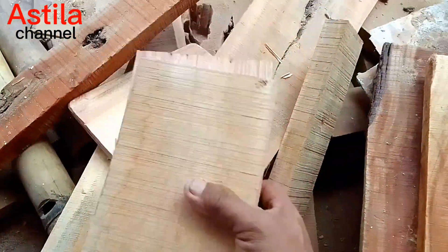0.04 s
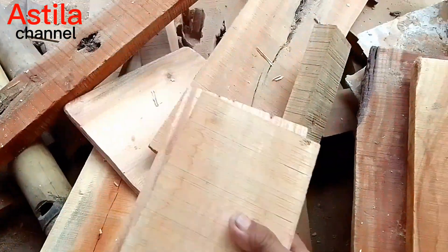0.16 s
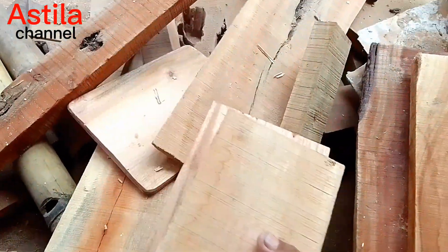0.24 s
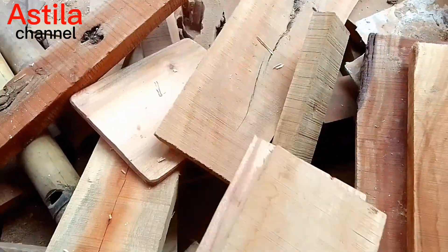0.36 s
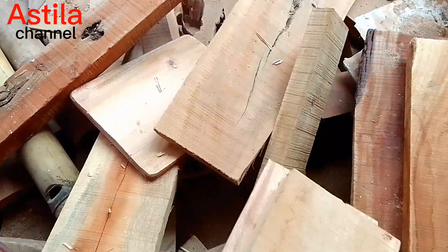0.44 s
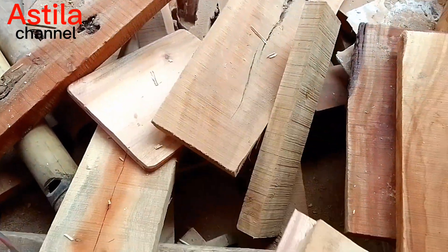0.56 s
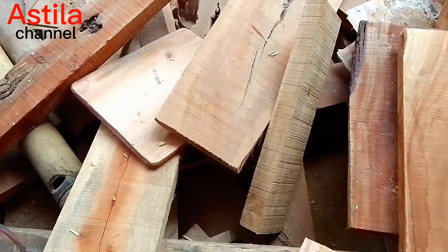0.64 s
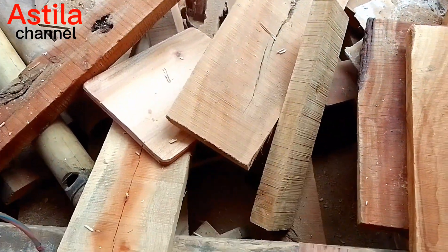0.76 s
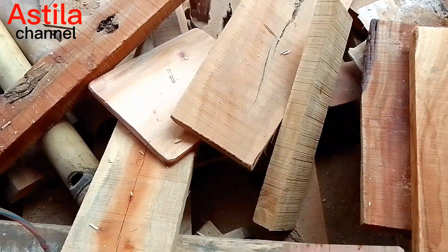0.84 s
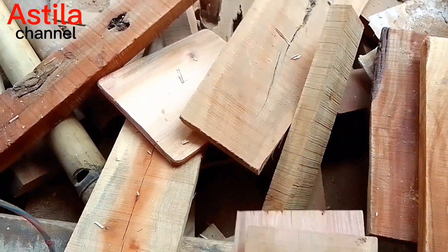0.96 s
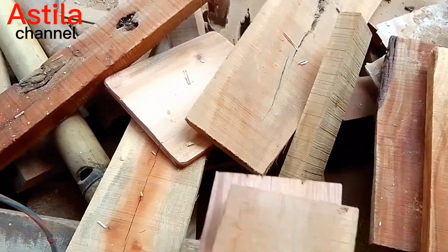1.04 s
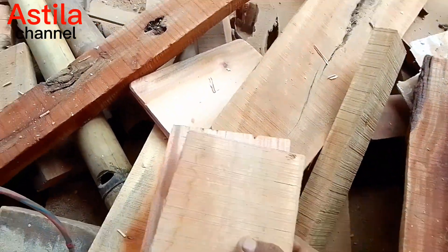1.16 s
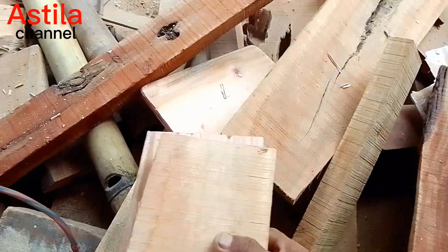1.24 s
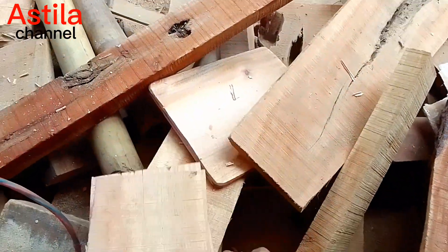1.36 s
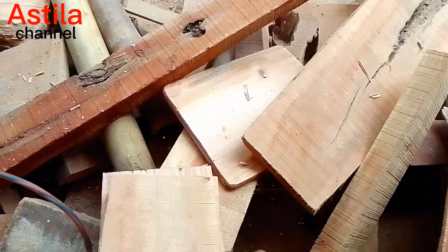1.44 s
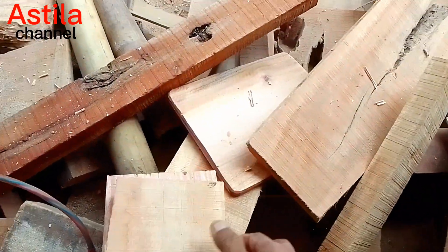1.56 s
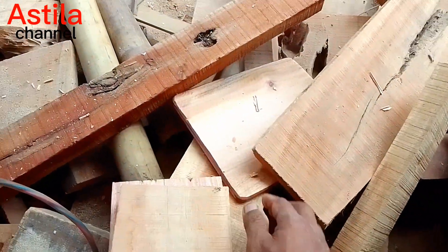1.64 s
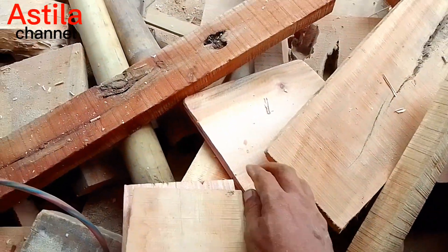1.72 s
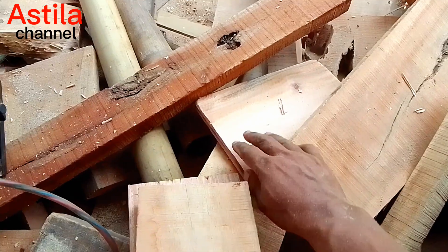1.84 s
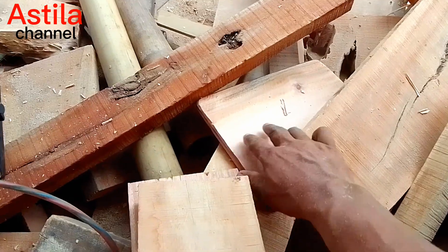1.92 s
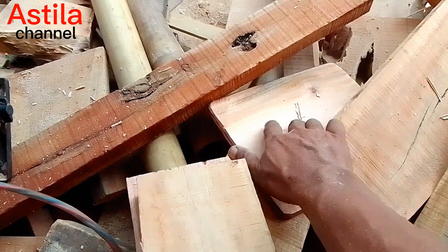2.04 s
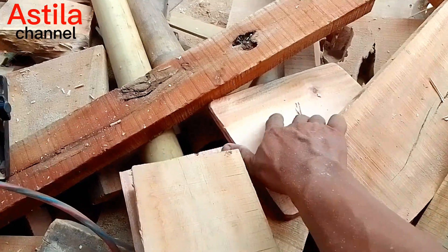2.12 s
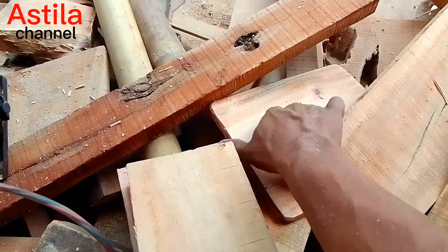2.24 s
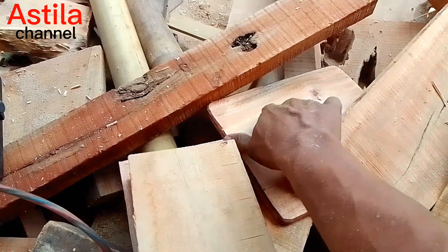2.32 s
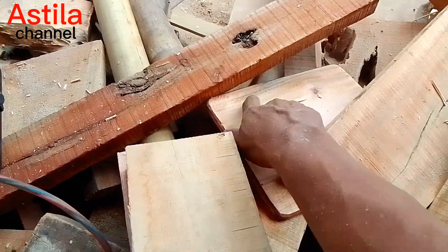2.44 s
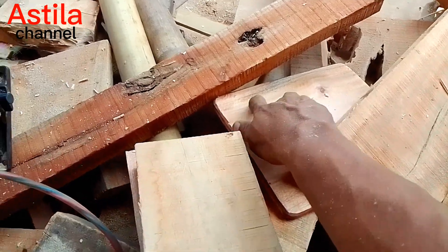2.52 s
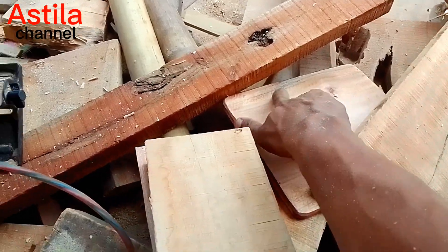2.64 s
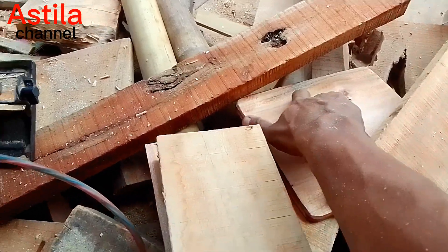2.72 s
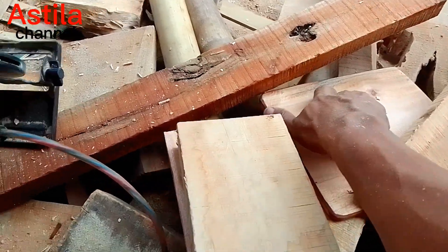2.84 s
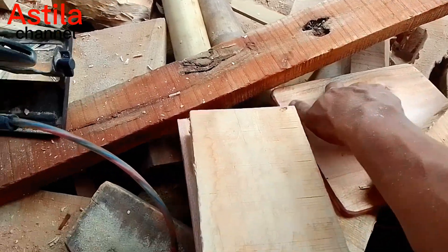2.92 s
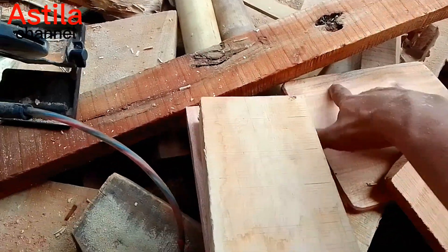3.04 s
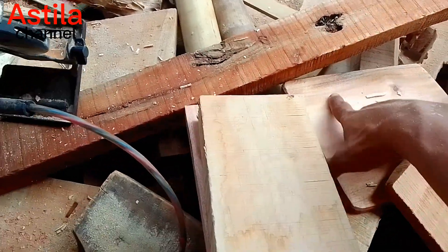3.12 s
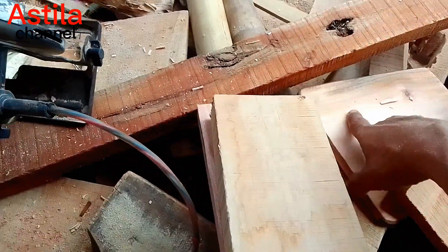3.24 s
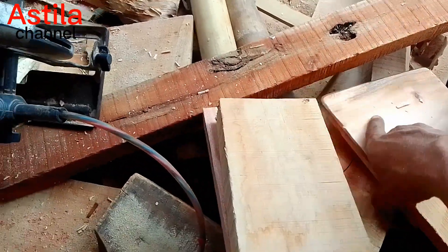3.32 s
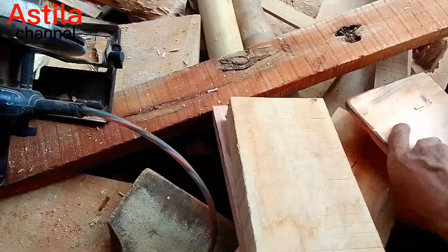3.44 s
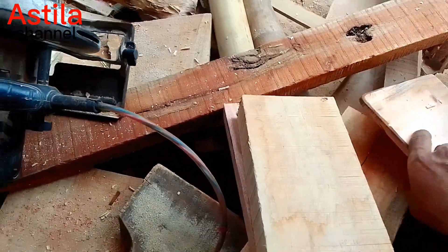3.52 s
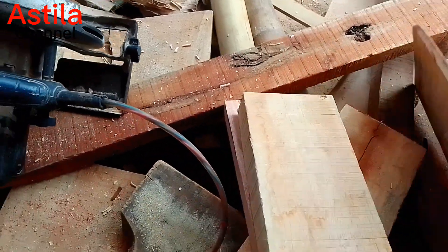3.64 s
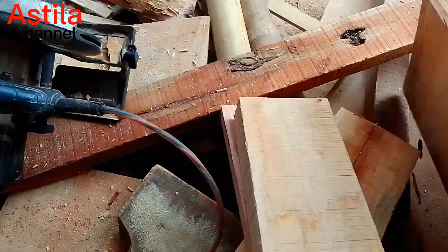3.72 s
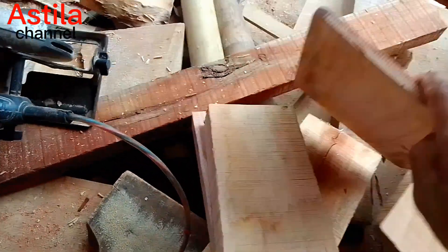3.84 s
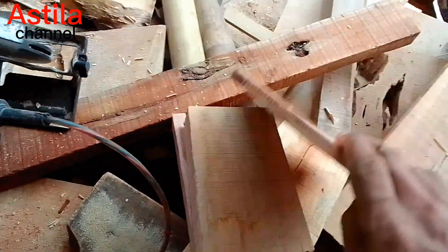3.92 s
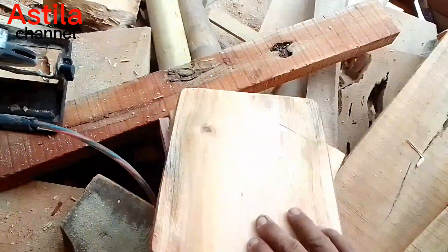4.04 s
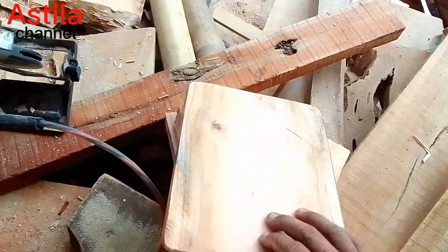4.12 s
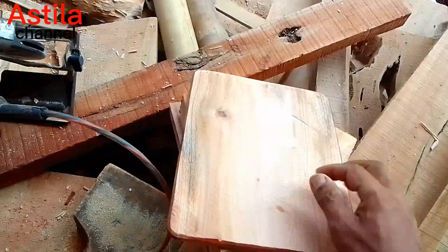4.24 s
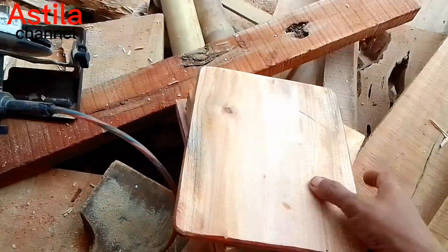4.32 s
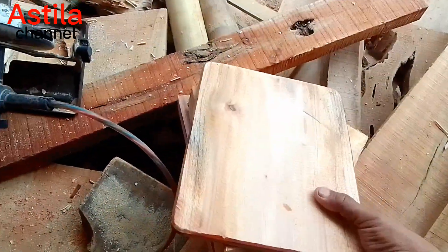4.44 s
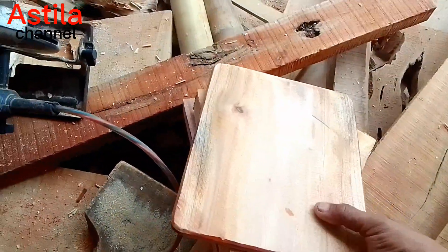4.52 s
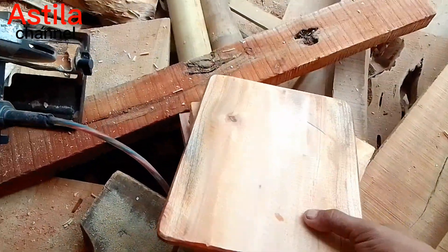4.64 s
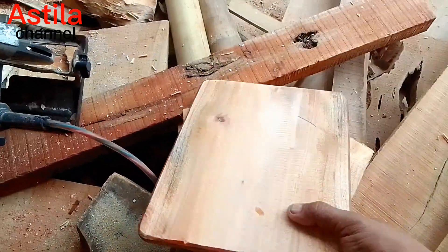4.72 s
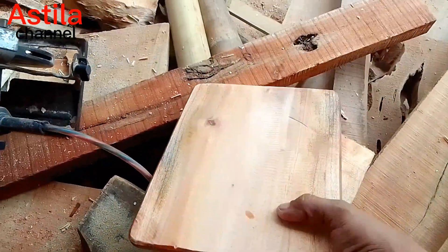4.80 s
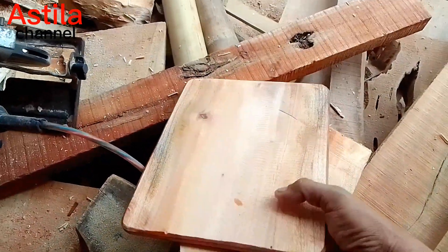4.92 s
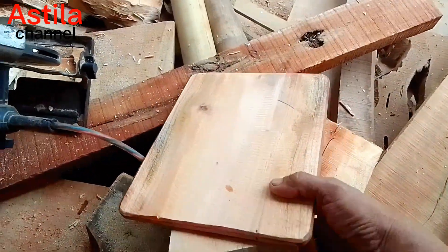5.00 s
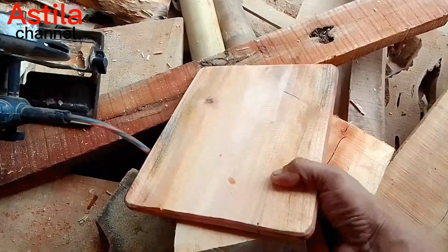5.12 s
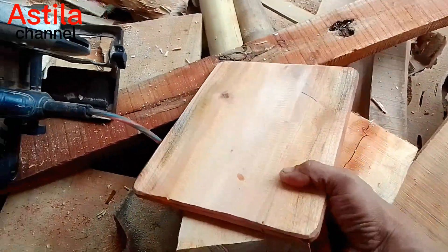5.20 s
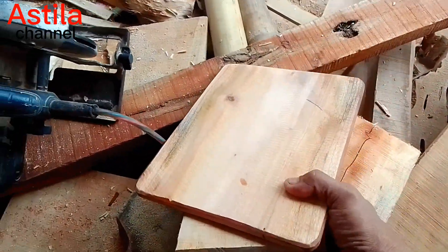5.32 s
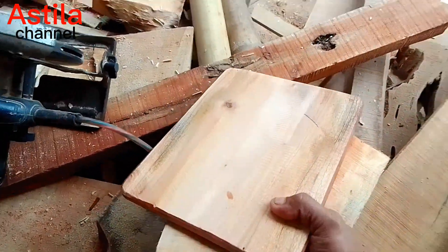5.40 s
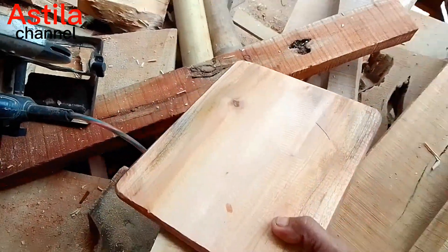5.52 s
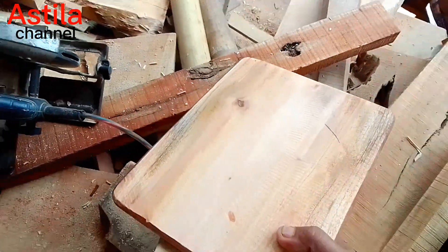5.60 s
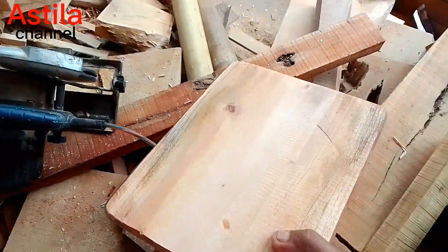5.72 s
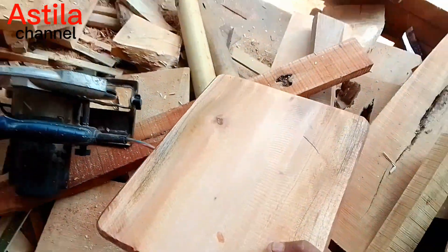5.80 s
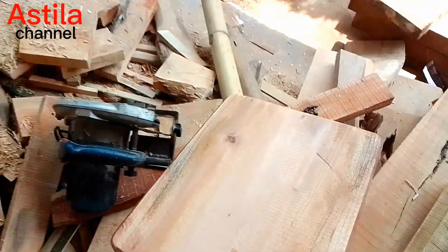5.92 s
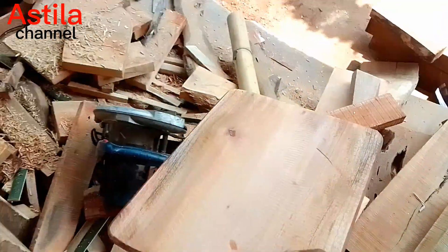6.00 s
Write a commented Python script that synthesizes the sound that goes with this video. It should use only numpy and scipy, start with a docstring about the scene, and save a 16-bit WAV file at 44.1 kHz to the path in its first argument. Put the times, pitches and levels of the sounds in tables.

```python
"""Wooden offcuts are lifted, dragged and stacked on a scrap pile close to a small microphone in an open shed.
Knocks are decaying modes with a thud and a crack; drags are stick-slip noise through resonances of the wood.
Further off a plank is dropped twice, and the shed rings after it through fading random echoes.
Low noise in gusts and single slow swings thump the microphone, over a quiet wash and a distant rumble."""
import sys
import numpy as np
from scipy import signal
from scipy.fft import rfft, irfft
from scipy.io import wavfile
from scipy.ndimage import uniform_filter1d

SR = 44100
rng = np.random.default_rng(int(sys.argv[2]) if len(sys.argv) > 2 else 0)


def waveform_to_disk(signal):
    """Save audio, clipped to [-1, 1], as 16-bit WAV at the path in sys.argv[1]."""
    frames = np.transpose(np.atleast_2d(signal))
    scaled = np.clip(frames, -1, 1) * 32767
    samples = np.round(scaled).astype(np.int16)
    wavfile.write(sys.argv[1], SR, samples)


def gain_from_decibels(decibels):
    """Convert decibel values to linear amplitude factors."""
    exponent = np.asarray(decibels, float) / 20
    return 10 ** exponent


N = 267290  # samples

# Modes of each board. Each row: frequency in Hz, width in Hz before scaling, relative level in dB.
BOARD_MODES = [
    [(1560, 47, -4), (2170, 140, 6), (3020, 94, -11)],
    [(547, 80, 2), (730, 56, 1.5), (1140, 23, -0.5), (1352, 113, 4), (1700, 81, 0), (2190, 150, -1)],
    [(528, 163, -0.5), (1020, 240, 1), (1392.6, 32, 5), (1668, 20, 5), (1954, 17, 3), (2440, 41, -19.5),
     (2624, 21, 1.5), (2940, 35.3, -28), (3226, 67, -27.5)],
    [(605, 65, 4.5), (869.5, 160, 12), (1105, 59, 5.5), (1321, 63, 10.5), (1580, 69, 14), (1950, 43, 8.5),
     (2170, 32, 3.5)],
]
# When each board is taken up, in seconds.
TAKEN_UP = [0, 1.8, 3.335, 4.4]
# How each board behaves. Each row: ring t60 at 1 kHz in seconds, shed echo of a knock in dB,
# boom of the pile under rubbing in dB.
HANDLING = [(.04, -12, -1), (0.053, -11, -4), (0.041, -13.5, -6), (0.044, -9.5, -5)]


def evened(x):
    """Normalisation: scales a signal to rms 1."""
    return x / np.sqrt(np.mean(x ** 2) + 1e-20)


def read(points, hz):
    """Interpolation: reads a curve at hz, straight on a log frequency axis."""
    f, value = np.transpose(points)
    return np.interp(np.log(hz + 1), np.log(f + 1), value)


def add(mix, s, sound):
    """Superposition: mixes a sound in at time s, in place."""
    part = mix[round(s * SR):][:len(sound)]
    part += sound[:len(part)]


def coloured(x, points):
    """Spectral shaping: weights each frequency by a curve in dB, then scales to rms 1."""
    gain = gain_from_decibels(read(points, np.fft.rfftfreq(len(x), 1 / SR)))
    return evened(irfft(rfft(x) * gain, len(x)))


def passed(x, hz, kind):
    """Steep filtering: a fourth-order low- or high-pass."""
    return signal.sosfilt(signal.butter(4, min(hz, 20000), kind, fs=SR, output="sos"), x)


def resonate(x, hz, width):
    """Resonance by heterodyne: shifts hz down to zero, smooths, shifts back; gain 1 at the peak."""
    turn = np.exp(2j * np.pi * np.cumsum(hz * np.ones(len(x))) / SR)
    r = np.exp(-np.pi * width / SR)
    smooth = signal.lfilter([1 - r], [1, -r], x / turn)
    return 2 * (turn * smooth).real


def resonate_twice(x, hz, width):
    """Resonators in cascade: two equal ones give steeper skirts."""
    return resonate(resonate(x, hz, width), hz, width)


def wander(length, hz):
    """Slow random modulation: noise averaged twice over 1 / hz seconds, rms 1."""
    span = int(SR / hz)
    return evened(uniform_filter1d(uniform_filter1d(rng.standard_normal(length), span), span))


def board_in_hand(s):
    """Succession of sources: index of the board held at time s."""
    return np.searchsorted(TAKEN_UP, s) - 1


def drag(wood, edges, boom_db, rows):
    """Stick-slip friction: saw-marked faces catch and slip in dense uneven clicks.

    They ring the board and its edges, boom in the pile and hiss in the dust."""
    # Dust under a sliding face. Each row: frequency in Hz, relative level in dB per Hz.
    grit_spectrum = [(1500, -17), (2500, 3.5), (3400, 3), (4200, -2.5), (6000, -5.5), (8700, -6.5),
                     (9600, -20), (10500, -44), (15500, -37), (16500, -93)]
    s, *columns = np.transpose(rows)
    t = np.arange(s[0] - .004, s[-1] + 0.014, 1 / SR)
    rub_db, contact_hz, hiss_db = (np.interp(t, s, c) for c in columns)

    sizes = gain_from_decibels(3.4 * np.minimum(rng.exponential(1, len(t)), 3.5))
    slips = (rng.random(len(t)) < 2000 / SR) * sizes * rng.choice([-1, 1], len(t))  # about 2000 a second
    uneven_db = 2.5 * wander(len(t), 90) + 1.7 * wander(len(t), 30)
    force = (evened(slips) + .9 * rng.standard_normal(len(t))) * gain_from_decibels(uneven_db)

    body, singing = np.zeros((2, len(t)))
    for hz, width, db in wood:
        near_db = -6.0 * np.log2(hz / contact_hz) ** 2  # modes near the contact pitch speak most
        wide = np.clip(1.96 * width, 50, 300)
        body += gain_from_decibels(db + near_db + 3 * wander(len(t), 25)) * resonate_twice(force, hz, wide)
    for hz, width, db in edges:
        wide = np.clip(2 * width, 90, 300)
        # each comes and goes as the contact moves
        singing += gain_from_decibels(db + 2.8 * wander(len(t), 13)) * resonate_twice(force, hz, wide)

    contact = resonate_twice(force, contact_hz, 105)
    boom = passed(resonate_twice(force, 250, 390), 150, "high")
    dust = coloured(force, grit_spectrum)
    rub = evened(passed(evened(body) + 0.74 * evened(contact), 3500, "low"))
    hiss = evened(1.1 * dust + evened(singing))
    stroke = gain_from_decibels(rub_db) * (rub + gain_from_decibels(boom_db) * evened(boom)) + gain_from_decibels(hiss_db) * hiss
    return stroke * signal.windows.tukey(len(t), 0.025 * SR / len(t))


def dragged_boards():
    """Sliding friction: each stroke of wood on wood drives the board in hand; gives (s, sound)."""
    # One table a stroke. Each row: time in seconds, rubbing level in dB, contact pitch in Hz, hiss level in dB.
    strokes = [
        [(0.186, -91, 1740, -65), (0.252, -93, 1740, -71), (0.332, -84, 1760, -74.5), (0.345, -94, 1700, -95),
         (0.38, -92, 1420, -91)],
        [(2.38, -65, 1170, -90), (2.45, -76.5, 1100, -88), (2.55, -67, 1200, -74), (2.585, -87, 1170, -97),
         (2.7, -65, 1100, -77), (2.74, -58, 955, -72), (2.784, -49.5, 650, -64), (2.83, -59.5, 620, -75),
         (2.96, -68, 624, -71)],
        [(2.99, -44.5, 560, -71.5), (3.035, -62, 620, -67), (3.06, -45.5, 600, -71), (3.1, -51.5, 750, -69),
         (3.172, -51.5, 726, -61), (3.286, -66.5, 723, -85), (3.33, -63, 748, -72)],
        [(3.335, -57.5, 716, -67), (3.401, -47.5, 1070, -56), (3.441, -32, 905, -50), (3.507, -42, 718, -49),
         (3.585, -35.5, 723, -53.5), (3.62, -53, 760, -59.5), (3.655, -39.5, 1280, -42.5),
         (3.695, -34, 1368, -44.5), (3.73, -46.5, 1250, -56.5)],
        [(3.735, -40, 1500, -50), (3.755, -26.5, 1480, -43), (3.78, -31, 1300, -45.5), (3.8, -25, 970, -34),
         (3.86, -27, 975, -45.5), (3.92, -37, 1040, -42), (3.968, -40.5, 1080, -42), (4.005, -28, 874, -62),
         (4.04, -57, 850, -66.5)],
        [(4.085, -29.5, 1070, -58.5), (4.112, -38, 1050, -57), (4.14, -27, 1160, -59),
         (4.165, -45, 1230, -63.5), (4.18, -29.5, 1700, -50.5)],
        [(4.7, -92, 1300, -85), (4.744, -67, 1360, -78.5), (4.785, -87, 1370, -81)],
        [(4.875, -46, 1220, -62.5), (4.933, -54.5, 1140, -63.5), (4.97, -52, 1400, -71),
         (5.02, -44.5, 1930, -72), (5.09, -43.5, 1890, -75), (5.13, -46.5, 1560, -73), (5.2, -58.5, 1500, -75),
         (5.228, -49.5, 1600, -79), (5.25, -53, 1530, -75), (5.39, -64.5, 1590, -83), (5.425, -80, 1510, -84)],
        [(5.475, -52, 731, -92), (5.519, -60, 700, -90), (5.6, -64.5, 600, -90.5), (5.68, -78, 620, -91)],
    ]
    # Thin edges that sing when rubbed, one list a board.
    # Each row: frequency in Hz, width in Hz before scaling, relative level in dB.
    edge_modes = [
        [(4340, 130, -7), (4620, 86, -7), (5270, 200, -7), (6350, 40, -6), (7040, 31, -7), (7370, 32, -8),
         (7900, 52, -13), (8800, 150, -20)],
        [(2860, 105, 7), (3010, 29, -14), (3230, 61, 2), (5820, 67, -3), (6260, 78, -16), (7270, 50, 2),
         (7600, 57, -20), (8300, 190, -17), (8700, 33, -1)],
        [(2452, 32, 4.5), (2703, 46, -12), (3140, 57, -14), (3460, 99, -7), (4480, 72, -12.5),
         (4866, 420, -12.5), (5760, 43, -23), (6900, 43, -13.5), (7540, 66, -17), (8370, 71, -45.5),
         (8850, 19, -35)],
        [(3220, 150, 9), (3950, 55, 1), (4250, 73, 5.5), (5270, 53, 8), (6160, 42, 4), (6470, 80, 8),
         (7140, 40, 6), (7850, 44, -9), (9000, 58, -16), (9390, 51, 0)],
    ]
    sounds = []
    for rows in strokes:
        board = board_in_hand(rows[-1][0] - .04)
        sound = drag(BOARD_MODES[board], edge_modes[board], HANDLING[board][2], rows)
        sounds.append((rows[0][0], sound))
    return sounds


def knock(wood, db, struck_hz, thud_db, crack_db, t60):
    """Modal impact: a blow rings the modes near its pitch most, with a low thud of the pile and a short crack."""
    # First contact of a blow. Each row: frequency in Hz, relative level in dB per Hz.
    crack_spectrum = [(1500, -9), (2500, 7.5), (3500, 1.5), (5000, -12), (7500, -23), (10000, -37),
                      (15500, -36), (16500, -88)]
    t = np.arange(round(.25 * SR)) / SR
    hz, _, mode_db = np.transpose(wood)
    extra = 450 * 6 ** rng.random(14)  # random weak modes make the ring denser
    hz = np.r_[hz, struck_hz, extra]
    mode_db = np.r_[mode_db, 2.5, np.full(len(extra), -10.5)]
    # where it is hit
    place_db = 1.6 * rng.standard_normal(len(hz)) - 7.2 * np.log2(hz / struck_hz) ** 2

    decay = max(t60, .005) * (hz / 1000) ** -.6  # wood damps its high modes first
    swings = np.sin(2 * np.pi * (hz[:, None] * t + rng.random((len(hz), 1))))
    ring = gain_from_decibels(mode_db + place_db) @ (gain_from_decibels(-60 * t / decay[:, None]) * swings)
    load_s = max(.0013 - .00006 * db, .001)  # the contact loads over a moment, longer for gentle blows
    ring *= np.sin(np.pi / 2 * np.minimum(t / load_s, 1)) ** 2

    low, high = rng.standard_normal((2, len(t)))
    thud = evened(passed(resonate_twice(low, 300, 350), 140, "high"))
    thud = thud * gain_from_decibels(-60 * t / 0.062) * (1 - np.exp(-t / 0.0044))
    crack = coloured(high, crack_spectrum) * gain_from_decibels(-60 * t / 0.033) * (1 - np.exp(-t / 0.0015))
    return gain_from_decibels(db) * (ring / abs(ring).max() + gain_from_decibels(thud_db) * thud + gain_from_decibels(crack_db) * crack)


def knocking_boards():
    """Modal impact: boards knock, and a few blows are strong catches of a scrape; gives (s, sound, echo dB)."""
    # Each row: start in seconds, ring peak in dB, struck pitch in Hz, thud and crack in dB relative to the ring.
    # The blows at 3.748, 3.794, 3.823 and 3.916 s are catches of a scrape.
    blows = [(1.901, -52, 1187, -0.5, -24), (2.348, -44, 781, 1, -31), (2.408, -60, 1290, -18, -7),
             (2.976, -36.5, 1283, -13, -20), (2.987, -28.5, 528, -16, -41), (3.025, -36, 1495, -10, -21),
             (3.048, -33.5, 560, -17, -49), (3.303, -48, 430, -29, -20), (3.34, -45.5, 483, -24.5, -22),
             (3.393, -34, 590, -19.5, -11), (3.462, -8.5, 663, -17.5, -19.5),
             (3.481, -20.5, 664.6, -19, -17.5), (3.532, -14.5, 483, -3.5, -13), (3.564, -20, 457, -1, -34),
             (3.667, -31, 547, -13, 0), (3.748, -23.5, 1605, -17, -10), (3.794, -16, 944, -18.5, -15.5),
             (3.823, -17, 1020, -14.5, -16), (3.841, -17.5, 1532, -20, -21.5),
             (3.869, -13.5, 651, -25, -14), (3.881, -2, 977, -13.5, -12), (3.916, -26, 1015, -32.5, -13.5),
             (3.981, -13, 637, -8.5, -27), (4.05, -2.5, 684, -15.5, -35), (4.053, 3, 1024, -10, -28.5),
             (4.066, -10.5, 958, -14, -53.5), (4.122, -7.5, 1228, -8.5, -14.5),
             (4.182, -2, 1026, -31.5, -18), (4.429, -49.5, 493, 8, -46), (4.512, -63.5, 441, 16, -40),
             (4.797, -35, 673, -3, -22), (4.807, -27.5, 870, 3, -17.5), (4.841, -17.5, 968, -18.5, -23),
             (5.101, -26.5, 1580, -9.5, -57), (5.219, -40, 1190, -4, -29), (5.38, -62.5, 1600, -21, 5),
             (5.44, -33, 1710, 1.5, -21.5), (5.455, -36, 693, 1.5, -46)]
    hits = []
    for s, *blow in blows:
        board = board_in_hand(s)
        t60, echo_db, _ = HANDLING[board]
        hits.append((s, knock(BOARD_MODES[board], *blow, t60), echo_db))
    return hits


def dropped_plank():
    """Modal impact: each landing further off is a short clatter of blows; gives (s, sound, echo dB).

    An earlier blow, returned first and apart, is for its dying echo alone."""
    # Each row: start in seconds, ring peak in dB, struck pitch in Hz, crack in dB relative to the ring,
    # shed echo in dB.
    landings = [(0.78, -16, 1318, -50.5, -7.5), (0.788, -10, 1950, -36, -12),
                (0.7934, -5.5, 1297, -37, -10.5), (0.845, -22, 1296, -30.5, -3.5),
                (0.864, -23.5, 1280, -29, -3.5), (1.487, -12.5, 1140, -16, -5.5),
                (1.494, -5, 1218, -29.5, -6.5), (1.513, -18, 1836, -12.5, -5), (1.518, 0.5, 1644, -9, -5),
                (1.525, -2, 1122, -15.5, -10), (1.537, -4.5, 1407, -11, -7),
                (1.548, -12.5, 673, -15.5, -5.5), (1.56, -7, 1700, -9, -5)]
    # Modes of the plank. Each row: frequency in Hz, width in Hz (blows ignore it), relative level in dB.
    plank_modes = [(673, 31, -16), (1219, 150, 1.5), (1758, 77, 1.5), (2031, 86, 5), (2830, 64, -9),
                   (3020, 32, -16), (3300, 85, -17.5), (3520, 56, -9.5), (4270, 22, -29.5),
                   (4440, 190, -22)]
    earlier = knock(plank_modes, -15, 1250, -28, -26, .08)
    hits = []
    for s, db, hz, crack_db, echo_db in landings:
        hits.append((s, knock(plank_modes, db, hz, -22, crack_db, 0.036), echo_db))
    return earlier, hits


def shed(x):
    """Reverberation: sparse echoes of random sign, each band dying at its own speed."""
    # Each row: frequency in Hz, t60 in seconds.
    band_t60 = [(150, 0.45), (500, 0.28), (1000, 0.32), (1290, 0.33), (1600, 0.33), (2050, 0.47),
                (2800, 0.36), (7000, .3), (14000, 0.045)]
    # Each row: frequency in Hz, relative level in dB.
    band_tone = [(150, 5), (600, 3), (1000, -1.5), (1290, 3), (1600, -2), (2050, -6.5), (2600, -1),
                 (6000, 1), (14000, -0.5)]
    taps = np.zeros(SR)
    at = np.arange(300, SR - 20, 20)
    taps[at + rng.integers(0, 20, len(at))] = rng.choice([-1., 1.], len(at))
    hz, t, z = signal.stft(taps, SR, nperseg=512)
    build = 1 - np.exp(-t / 0.0017)  # echoes gather over the first reflections
    fall_db = -60 * t / read(band_t60, hz)[:, None]
    fading = gain_from_decibels(fall_db) + gain_from_decibels(-28 + 0.38 * fall_db)  # far walls answer longer and weaker
    tone = gain_from_decibels(read(band_tone, hz)[:, None])
    tail = signal.istft(z * build * fading * tone, SR, nperseg=512)[1]
    return signal.fftconvolve(x, tail / np.linalg.norm(tail))[:len(x)]


def buffet():
    """Modulated low noise: rumble in gusts, and single slow bumps as short damped swings."""
    # Swells of the rumble. Each row: middle in seconds, length in seconds, level in dB.
    swells = [(2.835, .25, -53.5), (3.02, 0.32, -49.5), (3.248, 0.35, -55.5), (3.7, .8, -49),
              (4.33, 0.21, -53), (4.505, 0.33, -39.5), (4.623, 0.28, -52), (4.95, .1, -48.5),
              (5.206, 0.34, -42.5), (5.407, 0.29, -39.5), (5.56, 0.32, -50.5), (5.745, 0.16, -48.5),
              (5.889, 0.18, -50.5), (6.019, 0.09, -56.5)]
    # Each row: frequency in Hz, relative level in dB per Hz.
    gust_spectrum = [(13, -55), (22, -10), (48, 8.5), (83, 3.5), (153, -1.5), (216, -8), (258, -17),
                     (380, -22.5), (600, -35.5), (780, -59), (1320, -120)]
    # Bumps of about one swing. Each row: time in seconds, envelope peak in dB, frequency in Hz.
    # The one at 1.521 s comes with the overloaded plank landing.
    bumps = [(1.521, -32.5, 36.6), (4.446, -47.5, 61.4), (4.521, -48.5, 56.7), (4.558, -50, 32.6),
             (5.359, -44.5, 54), (5.417, -42, 48.4), (5.738, -28.5, 65)]
    t = np.arange(N) / SR
    gusts = np.zeros(N)
    for s, length, db in swells:
        gusts += gain_from_decibels(db) * np.cos(np.pi * np.clip((t - s) / length, -.5, .5)) ** 2
    lumpy = coloured(rng.standard_normal(N), gust_spectrum) * gain_from_decibels(3 * wander(N, 25))
    out = gusts * evened(lumpy)
    for s, db, hz in bumps:
        turns = np.arange(-1.5, 2.5, hz / SR)
        swing = np.exp(-(turns / .6) ** 2) * np.sin(2 * np.pi * turns)
        add(out, s - 0.86 / hz, gain_from_decibels(db) * swing)
    return out


def faint(length, start_hz, end_hz, width, db):
    """Narrow-band noise: a fluttering band swells, glides and fades."""
    u = np.linspace(0, 1, round(length * SR))
    hz = start_hz + (end_hz - start_hz) * u
    band = evened(resonate_twice(rng.standard_normal(len(u)), hz, width))
    flutter_db = 3 * wander(len(u), 120)
    return gain_from_decibels(db - 5 * u + flutter_db) * band * signal.windows.tukey(len(u), .3)


def far_sounds():
    """Narrow-band noise: a falling chirp, a few soft tones and wisps of high hiss; gives (s, sound)."""
    # Each row: start in seconds, length in seconds, start and end pitch in Hz, width of one resonator in Hz,
    # level in dB before it sinks by 5 dB.
    bands = [(0.624, 0.17, 803, 785, 40, -83), (1.055, 0.25, 491.6, 493, 30.36, -75),
             (1.196, 0.022, 6070, 4050, 690, -71.5), (3.119, 0.14, 12500, 12500, 4000, -74),
             (5.079, 0.23, 13090, 13610, 3900, -77.5), (5.857, 0.29, 630, 643, 40.1, -77),
             (5.921, 0.057, 2920, 3006, 700, -75)]
    return [(s, faint(*shape)) for s, *shape in bands]


def air():
    """Stationary broadband noise: the quiet wash of the yard, swelling a little, over a steady distant rumble."""
    # Each row: frequency in Hz, relative level in dB per Hz.
    wash_spectrum = [(120, -23), (200, 2.5), (249, -9), (392, -9.5), (890, -12.5), (1280, -6.5), (1480, -9),
                     (2330, -18.5), (3420, -23), (3960, -21.5), (7900, -28.5), (10400, -29), (15500, -38.5)]
    # Each row: frequency in Hz, relative level in dB per Hz.
    rumble_spectrum = [(14, -30), (24, -3.5), (27, -5), (38, -4), (59, 0.5), (97, -7.5), (134, -12),
                       (221, -36), (267, -39.5), (300, -24.5), (390, -51.5), (660, -120)]
    wash = gain_from_decibels(-75.5 + 0.42 * wander(N, 1.8)) * coloured(rng.standard_normal(N), wash_spectrum)
    return wash + gain_from_decibels(-61) * coloured(rng.standard_normal(N), rumble_spectrum)


def scene():
    """Superposition: direct sound and three sends to the shed; hits take them in turn so that echoes differ."""
    lead = SR // 2  # half a second ahead of the start, for the earlier echo
    direct, sends = np.zeros(N), np.zeros((3, N + lead))
    earlier, hits = dropped_plank()
    add(sends[0], .5 - .22, earlier)  # 0.22 s before the start
    hits += knocking_boards()
    for k, (s, sound, echo_db) in enumerate(hits):
        add(direct, s, sound)
        add(sends[k % 3], s + .5, gain_from_decibels(echo_db) * sound)
    for s, sound in dragged_boards():
        add(direct, s, sound)
        add(sends[1], s + .5, gain_from_decibels(-14.0) * sound)
    for s, sound in far_sounds():
        add(direct, s, sound)
        add(sends[2], s + .5, gain_from_decibels(-8.5) * sound)
    echoes = sum(shed(send)[lead:] for send in sends)
    return (direct + echoes + buffet() + air())[None]


def band_limit(x):
    """A steep low-pass at the top of the band."""
    return signal.sosfilt(signal.butter(12, 15830, fs=SR, output="sos"), x)


def record(dry):
    """Saturation: the loudest blows overload the input with a firm knee; the input stage adds a constant bias."""
    overload, bias = .71, .0057  # of full scale
    clipped = dry / (1 + abs(dry / overload) ** 8) ** (1 / 8) + bias
    return band_limit(clipped)


dry = scene()
out = record(dry)
waveform_to_disk(out)
```